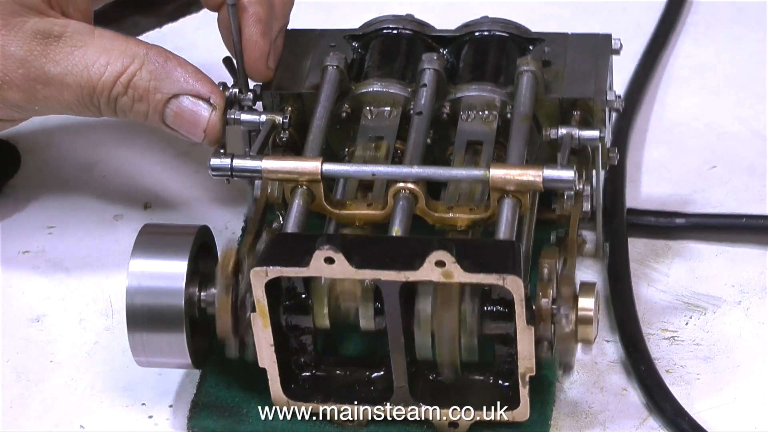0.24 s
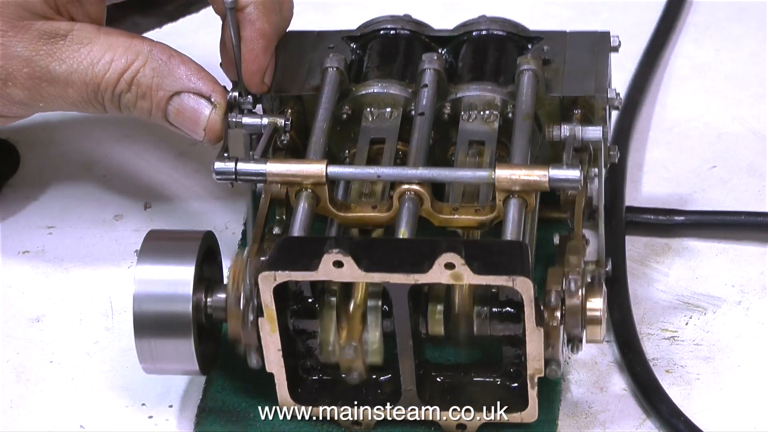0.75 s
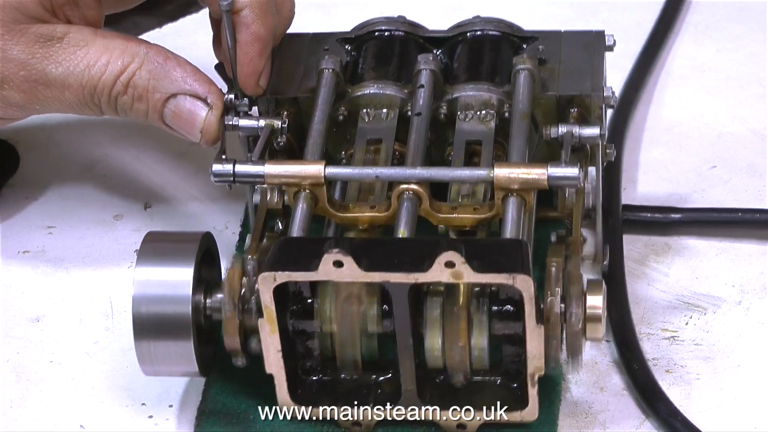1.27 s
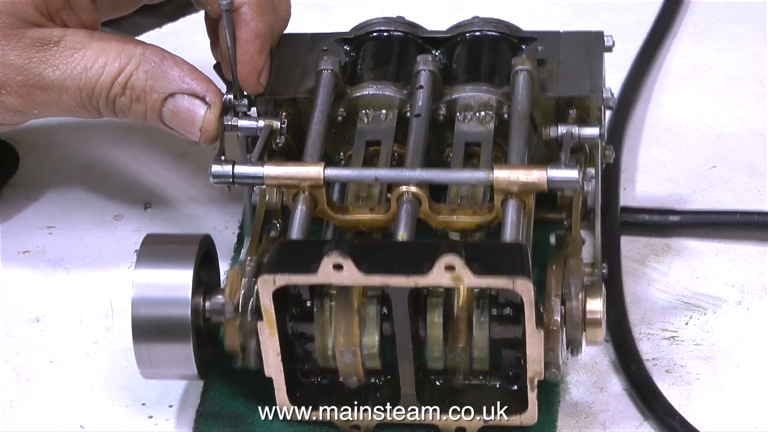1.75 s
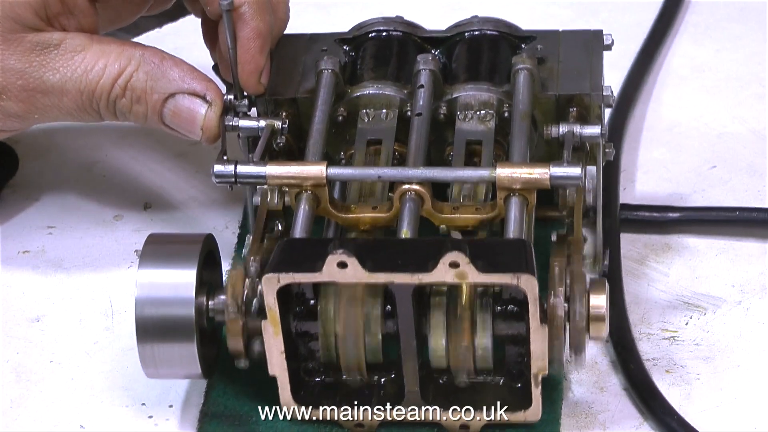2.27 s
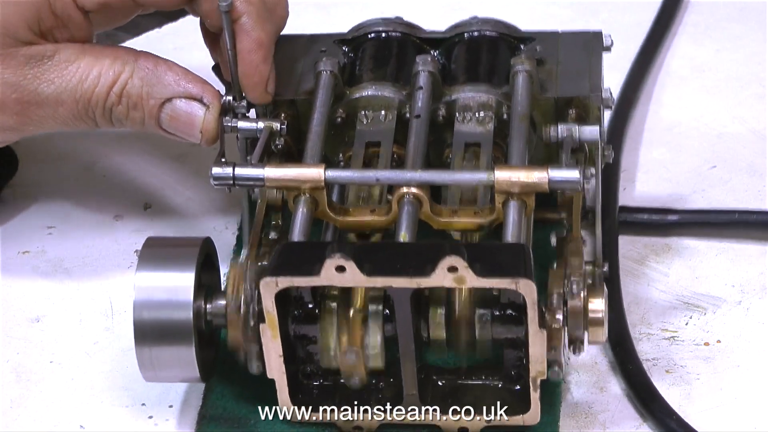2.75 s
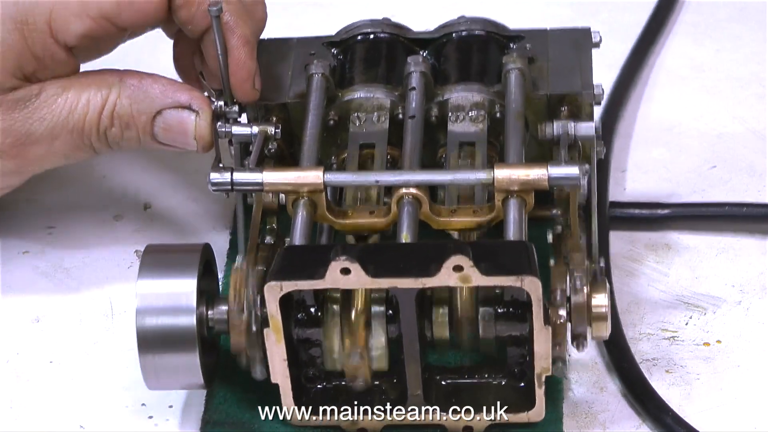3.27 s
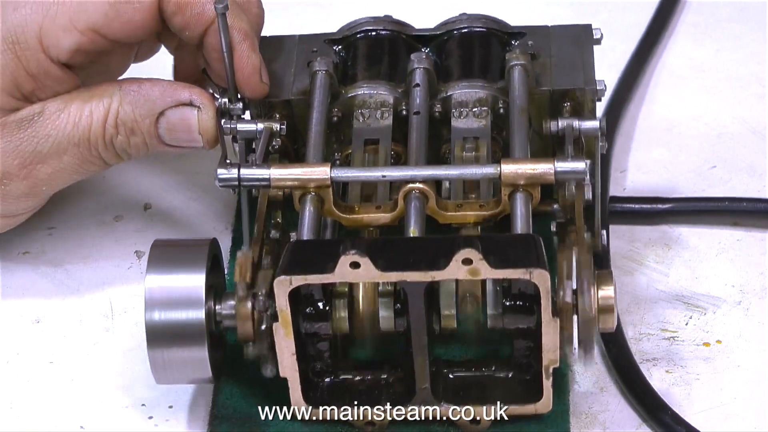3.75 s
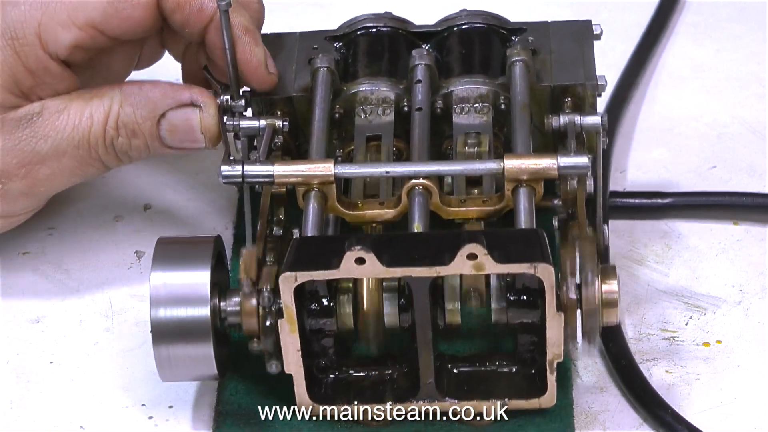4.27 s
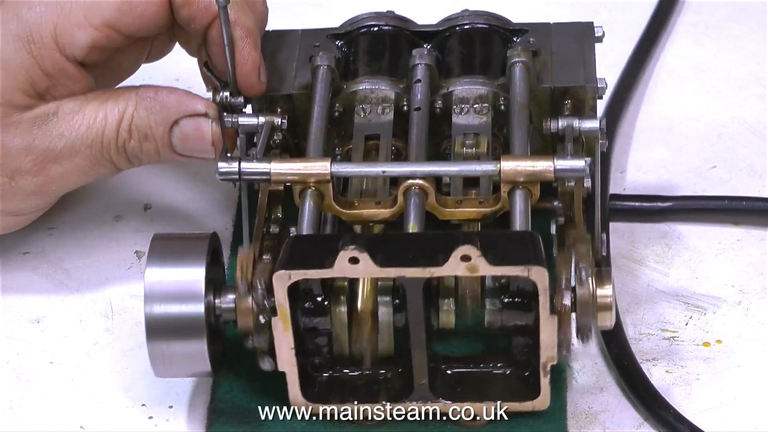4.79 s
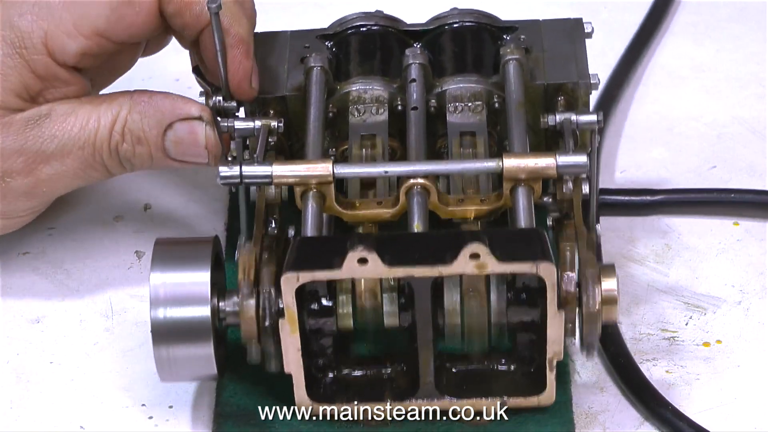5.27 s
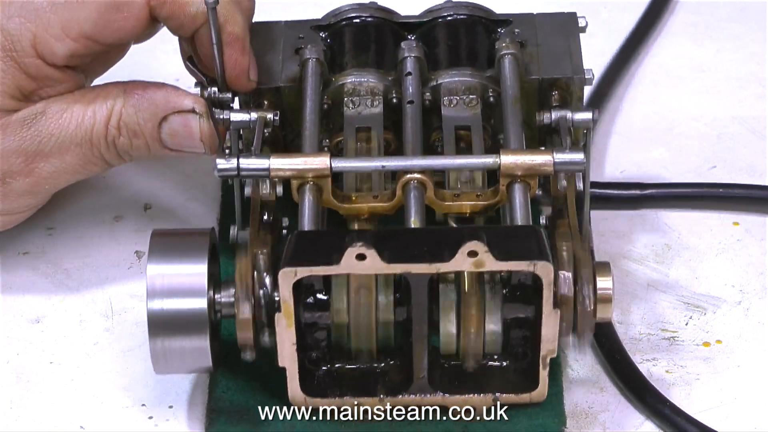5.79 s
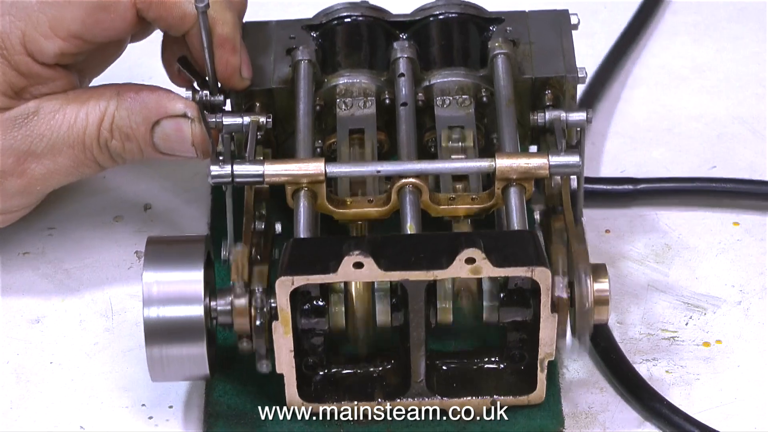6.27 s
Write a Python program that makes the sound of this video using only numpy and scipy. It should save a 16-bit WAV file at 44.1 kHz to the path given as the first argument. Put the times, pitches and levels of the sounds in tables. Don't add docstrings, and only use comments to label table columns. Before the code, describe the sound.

A small model engine runs fast on compressed air on a workshop bench, close to the microphone. Sharp hissing exhaust puffs, four per turn, blur into a bright flutter at around fifteen turns a second. Fine metallic ticks and dull thumps sit underneath. The frame knocks and chatters on the board, harder midway, then falls quiet near the end while the engine runs on slightly faster.

```python
import sys
import numpy as np
from scipy import signal
from scipy.fft import rfft, irfft, next_fast_len
from scipy.io import wavfile

SR = 44100
rng = np.random.default_rng(int(sys.argv[2]) if len(sys.argv) > 2 else 0)


def to_wav(s):
    ch = np.atleast_2d(s).T
    pcm = np.round(np.clip(ch, -1, 1) * 32767)
    wavfile.write(sys.argv[1], SR, pcm.astype(np.int16))


def voltage_ratio(level):
    return 10 ** (np.asarray(level, float) / 20)


N = 288414

# time in seconds, force in dB, hardness of the contact in dB.
ROCKING = [(.1, -54.8, -14), (.95, -55, -17), (1.36, -52, -17), (1.96, -53.5, -13), (2.4, -53, -5.5),
           (2.95, -52.5, -4), (3.34, -54, -5), (3.7, -52, -5), (3.85, -55, -18), (4.32, -59, -19),
           (4.76, -60, -16), (4.83, -50.5, -20), (5.31, -51, -15)]


def in_time(rows):
    time_s, *columns = np.transpose(rows)
    return [np.interp(np.arange(N) / SR, time_s, column) for column in columns]


def rms_one(x):
    return x / np.sqrt(np.mean(x ** 2) + 1e-20)


def drift(hz):
    pole = np.exp(-2 * np.pi * hz * 10 / SR)
    noise = rng.standard_normal(N // 10 + 2002)
    slow = signal.lfilter([1], [1, -2 * pole, pole * pole], noise)[2000:]
    return np.interp(np.arange(N) / 10, np.arange(len(slow)), rms_one(slow))


def coloured(spectrum, lifts=(), low_hz=10, high_hz=20000):
    size = next_fast_len(N)
    hz = np.arange(1, size // 2 + 2) * SR / size
    point_hz, point_db = np.transpose(spectrum)
    db = np.interp(np.log(hz), np.log(point_hz), point_db)
    for centre_hz, width_hz, lift_db in lifts:
        db += lift_db / (1 + (2 * (hz - centre_hz) / width_hz) ** 2)
    edges = 1 / np.sqrt((1 + (low_hz / hz) ** 40) * (1 + (hz / high_hz) ** 40))
    noise = rfft(rng.standard_normal(size))
    return rms_one(irfft(noise * voltage_ratio(db) * edges, size)[:N])


def ring(clicks, hz, t60_s):
    r, w = voltage_ratio(-60 / (t60_s * SR)), 2 * np.pi * hz / SR
    return signal.lfilter([0, np.sin(w)], [1, -2 * r * np.cos(w), r * r], clicks + 1e-18)


def clicks_at(turns, angles, sizes):
    at = np.searchsorted(turns, angles.ravel())
    keep = (at > 0) & (at < N)
    return np.bincount(at[keep], sizes.ravel()[keep], N)


def contacts(turns, table, modes, spread_db, slack_turn):
    table, out = np.array(table), 0
    angles = np.arange(-1, turns[-1] + 1)[:, None] + table[:, 0]
    angles = angles + slack_turn * rng.standard_normal(angles.shape)
    signs = table[:, 2] if table.shape[1] > 2 else 1
    common_db = spread_db * rng.standard_normal(angles.shape)
    for k, (hz, level_db, t60_s) in enumerate(modes):
        own_db = 0.53 * spread_db * rng.standard_normal(angles.shape)
        sizes = signs * voltage_ratio(table[:, 1] + level_db + common_db + own_db)
        out = out + (-1) ** k * ring(clicks_at(turns, angles, sizes), hz, t60_s)
    return out


def steadied():
    start_s, takes_s = 5.39, .06
    return np.clip((np.arange(N) / SR - start_s) / takes_s, 0, 1)


def crankshaft():
    # time in seconds, speed in turns per second.
    speed = [(0, 13.15), (.45, 14.05), (.85, 14.74), (1.7, 14.91), (2.15, 15.24), (2.75, 14.99),
             (3.2, 15.55), (3.8, 15.4), (4.4, 15.14), (5.25, 15.11), (5.5, 15.75), (6, 15.97),
             (6.54, 15.75)]
    start_turn = .112
    return start_turn + np.cumsum(in_time(speed)[0]) / SR


def shop(x):
    t60_s, level_db = .15, -13
    t = np.arange(int(.4 * SR)) / SR
    tail = signal.lfilter([1], [1, -.2], rng.standard_normal(len(t)))
    tail = tail * voltage_ratio(-60 * t / t60_s) * (t > .004)
    return voltage_ratio(level_db) * signal.fftconvolve(x, tail / np.sqrt(np.sum(tail ** 2)))[:N]


def bearings(turns):
    # frequency in Hz, density in dB per Hz.
    rumble = [(30, -20), (100, -14), (200, -24), (330, -1.5), (600, -3.5), (750, -7), (950, -16),
              (1500, -13)]
    level_db, throb_db, throb_turn = -62, 5, .9
    shake_from_db, shake_share = -60, .42
    shake_db = shake_share * (in_time(ROCKING)[0] - shake_from_db) * (1 - steadied())
    swell_db = throb_db * np.cos(2 * np.pi * (turns - throb_turn))
    noise = coloured(rumble, [(372, 40, 4), (560, 60, 3)], high_hz=1700)
    return voltage_ratio(level_db + shake_db + swell_db) * noise


def bench(turns):
    # time in seconds, front angle in turns, rear angle in turns, front dB, rear dB.
    landing = [
        (0, -.014, .44, -5, -1.2),
        (.8, .11, .55, -4, -2.5),
        (1.9, .25, .65, -4, -5.5),
        (2.7, .31, .73, -.8, -6),
        (3.65, .29, .59, -.4, -9),
        (3.8, .16, .58, -4, -12),
        (4.72, .15, .58, -5, -15),
        (4.8, .35, .53, .1, -7),
        (5.4, .35, .54, -4.5, -19),
    ]
    # frequency in Hz, level in dB, t60 in seconds, group (0 low, 1 middle, 2 upper).
    board = [(270.5, -5.5, .05, 0), (340, -3.5, .07, 0), (380, -3, .09, 0), (436, -7, .05, 0),
             (490, -4.5, .05, 1), (535, -2.5, .06, 1), (585, -1.2, .055, 1), (702, -12, .04, 1),
             (785, .5, .04, 2), (883, -2, .03, 2), (1107, -4, .027, 2), (1240, -3, .03, 2),
             (1390, -2, .035, 2)]
    # low modes in dB, middle in dB, upper in dB.
    feet = [
        (0, -8, 0),
        (0, -1, -5),
        (-15, 0, -4),
    ]
    bounce_db = [
        [-7],
        [-5.5],
        [-15],
    ]
    side_turn, side_level_db, side_joins_s = .46, -1.2, 1.5
    bounce_turn, bounce_slack_turn, landing_slack_turn = .065, .014, .008
    middle_db, middle_follows = -54.3, -.12
    steadied_db = -22

    turn = np.arange(int(turns[-1]))
    at = np.searchsorted(turns, turn + .5)
    front, rear, front_db, rear_db = np.array(in_time(landing))[:, at]
    side_db = side_level_db - 25 * np.clip(1 - at / SR / side_joins_s, 0, 1) ** 2
    lands = np.transpose([front, rear, side_turn + 0 * front])
    bounce = np.arange(4)
    chance = rng.standard_normal((len(turn), 3, 4, len(board) + 2))
    slack = (landing_slack_turn + bounce_slack_turn * bounce) * chance[..., -1]
    angles = turn[:, None, None] + lands[..., None] - .04 + bounce_turn * bounce + slack
    blow_db = np.transpose([front_db, rear_db, side_db])[..., None]
    blow_db = blow_db + np.array(bounce_db) * bounce + .9 * chance[..., -2]

    groups = [0, 0, 0]
    for k, (hz, level_db, t60_s, group) in enumerate(board):
        group = int(group)
        drive_db = np.array(feet)[:, group, None]
        sizes = voltage_ratio(blow_db + level_db + drive_db + 1.4 * chance[..., k])
        groups[group] += (-1) ** k * ring(clicks_at(turns, angles, sizes), hz, t60_s)

    felt = signal.butter(3, [240, 1500], "band", fs=SR, output="sos")
    force_db, hard_db = in_time(ROCKING)
    middle_level_db = middle_db + middle_follows * (force_db - force_db.mean())
    levels_db = [force_db, middle_level_db, force_db + hard_db]
    return sum(voltage_ratio(db + steadied_db * steadied()) * rms_one(signal.sosfilt(felt, group))
               for db, group in zip(levels_db, groups))


def pressure_thumps(turns):
    # angle in turns, level in dB, signed size.
    thumps = [
        (.93, -54, 1),
        (.005, -55, 1),
        (.2, -56.5, 1),
        (.36, -62, -1.4),
        (.62, -61, -1.3),
    ]
    # frequency in Hz, level in dB, t60 in seconds.
    casing = [(140, -9, .04), (268, -8, .06), (352, -4.5, .08), (428, -4.5, .07), (522, -1.5, .08),
              (603, -5, .06), (713, -3.5, .06)]
    x = contacts(turns, thumps, casing, spread_db=1.7, slack_turn=.0024)
    return signal.sosfilt(signal.butter(2, 800, fs=SR, output="sos"), x)


def valve_gear(turns):
    # angle in turns, level in dB.
    ticks = [
        (.44, -41.5),
        (0.93, -39),
        (.2, -43),
        (.7, -46.5),
    ]
    # frequency in Hz, level in dB, t60 in seconds.
    gear = [(2030, -14, .04), (2590, -12.5, 0.032), (2885, -11, .06), (3630, -5.2, 0.023),
            (3980, -5, 0.037), (4400, -5.5, 0.027), (6530, -8.5, .02)]
    x = contacts(turns, ticks, gear, spread_db=3.6, slack_turn=.015)
    return signal.sosfilt(signal.butter(2, 1800, "high", fs=SR, output="sos"), x)


def exhaust(turns):
    # time in seconds, jet in dB, breadth (lift of the zones beside the jet) in dB.
    flow = [(.12, -22, 1), (.3, -25.5, -1), (.75, -23.5, 1), (.95, -26.5, -1.5), (1.38, -23, .6),
            (1.56, -25.5, -.6), (1.76, -23.5, -1.2), (1.96, -25.5, -1), (2.36, -24, -.8), (2.56, -24, 1.5),
            (3.15, -23.5, .6), (3.34, -25, -.6), (3.6, -25.2, 1.8), (4.1, -25.2, .3), (4.92, -23.5, 1.5),
            (5.11, -26.5, -.8), (5.6, -24, .4), (6.45, -24.2, -.7)]
    # opening angle in turns, open length in turns, then passages, edge hiss, jet and top in dB.
    ports = [
        (.085, 0.13, -3.5, -0.7, 0, 1.3),
        (.335, 0.18, 2, -4, 1.8, -1),
        (.575, 0.18, -1.5, -3.5, 0.5, 2.1),
        (.85, 0.24, 1, -0.5, 2.5, -0.5),
    ]
    zones_hz = [900, 4400, 8800, 12000, 17000]
    # mean in dB, share of jet swing, share of breadth, change once steadied in dB.
    zones = [
        (-39, .3, .9, -2),
        (-34.8, .3, .9, -.3),
        (-27.2, .3, .9, .2),
    ]
    # frequency in Hz, density in dB per Hz.
    air_spectrum = [(530, -63), (900, -48), (1050, -43), (1400, -36.5), (1600, -38), (2000, -26),
                    (2800, -19.5), (4200, -22), (5200, -19), (8500, -14), (10000, -2.5), (11500, -6),
                    (13000, -13.5), (14300, -12.5)]
    # frequency in Hz, width in Hz, lift in dB.
    passages = [(1240, 60, 3), (1390, 66, 4.5), (2037, 88, 4), (2566, 67, 7), (2915, 49, 6.5),
                (3230, 230, 6), (3648, 130, 7.5), (3960, 87, 5.5), (4230, 50, 2.5), (4430, 57, 4.5),
                (4780, 74, 1.5), (5060, 60, 0), (5570, 75, 1.5), (6490, 300, 2), (9560, 120, 1),
                (10200, 150, 3.5), (10740, 100, 3), (11270, 140, 1.5), (14000, 140, 6), (14800, 110, 5)]
    opening_turn, blowdown_turn, closing_turn = .028, .1, .013

    jet_db, breadth_db = in_time(flow)
    swing_db = jet_db - jet_db.mean()
    levels_db = [mean_db + jet_share * swing_db + breadth_share * breadth_db + held_db * steadied()
                 for mean_db, jet_share, breadth_share, held_db in zones]
    levels_db.insert(2, jet_db)
    strength = rng.standard_normal((int(turns[-1]) + 2, len(ports), 5))
    gusts, out = drift(hz=150), 0
    for k, level_db in enumerate(levels_db):
        power = voltage_ratio(-6) ** 2
        for j, (opens, length, *zone_db) in enumerate(ports):
            turn, since = np.divmod(turns - opens + 1, 1)
            turn = turn.astype(int)
            blow = (1 - np.exp(-since / opening_turn)) * (0.38 + 0.47 * np.exp(-since / blowdown_turn))
            shut = 1 / (1 + np.exp((since - length) / closing_turn))
            chance_db = 0.53 * strength[turn, j, 4] + 0.83 * strength[turn, j, k]
            power = power + blow * shut * voltage_ratio(zone_db[k] + chance_db) ** 2
        flutter = voltage_ratio(0.53 * gusts + 0.78 * drift(hz=89))
        air = coloured(air_spectrum, passages, zones_hz[k], zones_hz[k + 1])
        out = out + voltage_ratio(level_db) * rms_one(np.sqrt(power) * flutter * air)
    return out


def scene():
    turns = crankshaft()
    engine = bench(turns) + pressure_thumps(turns) + valve_gear(turns) + exhaust(turns)
    return (engine + shop(engine) + bearings(turns))[None]


def top_cut(x):
    return signal.sosfilt(signal.butter(12, 16740, fs=SR, output="sos"), x)


def record(dry):
    x = signal.sosfilt(signal.butter(3, 150, "high", fs=SR, output="sos"), dry)
    x = signal.sosfilt(signal.ellip(14, .3, 70, 15740, fs=SR, output="sos"), x)
    return top_cut(x)


dry = scene()
out = record(dry)
to_wav(out)
```